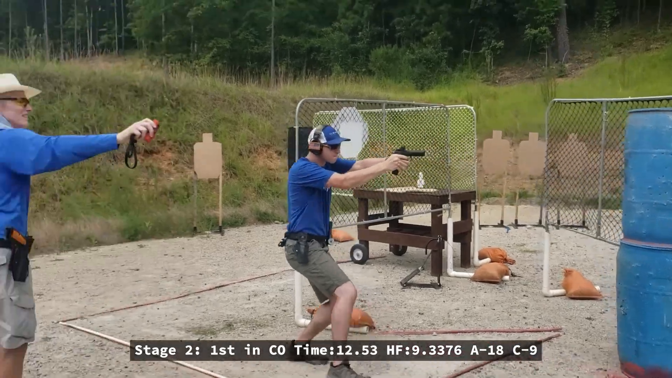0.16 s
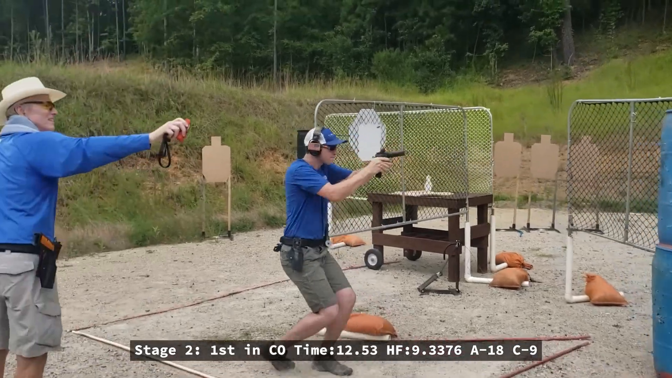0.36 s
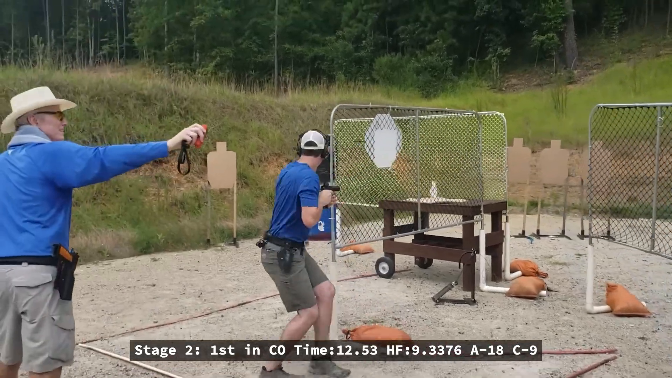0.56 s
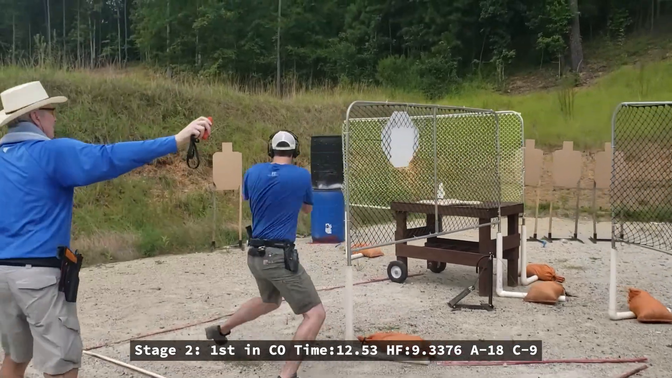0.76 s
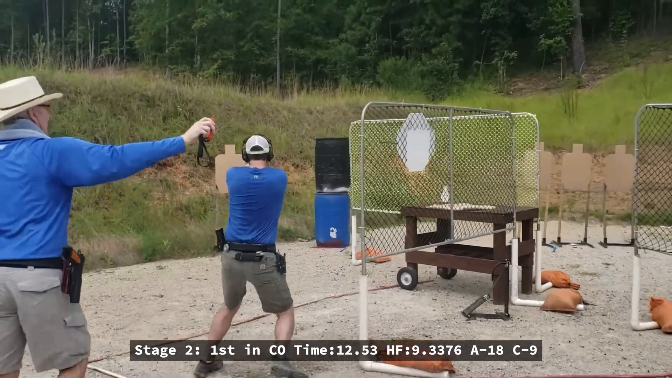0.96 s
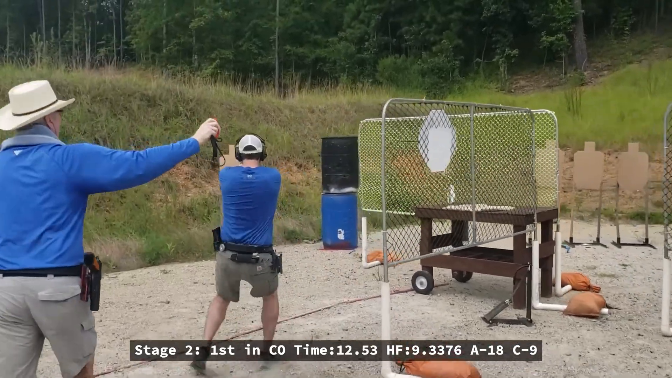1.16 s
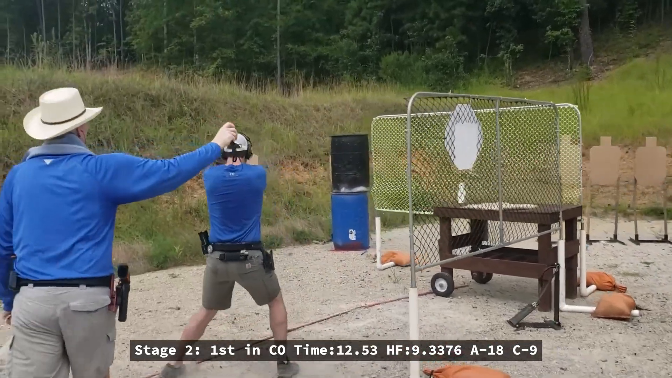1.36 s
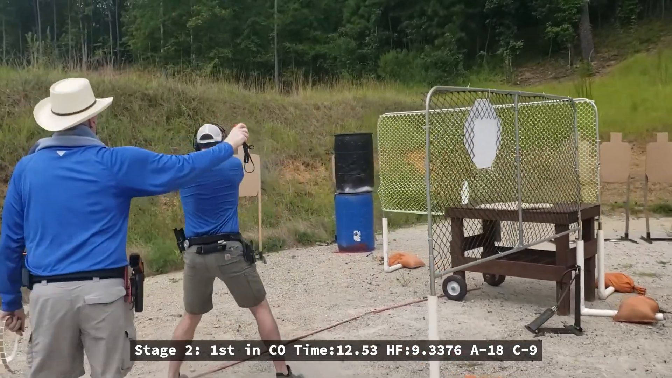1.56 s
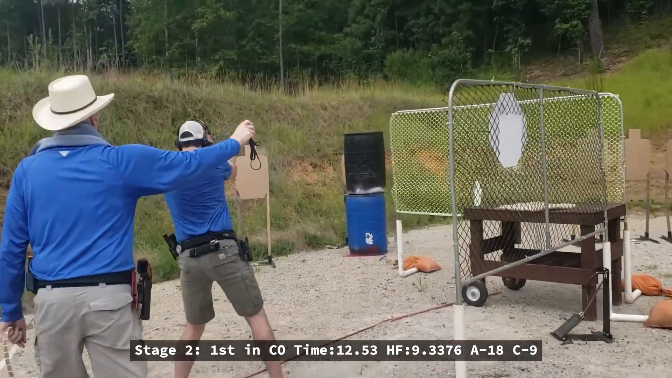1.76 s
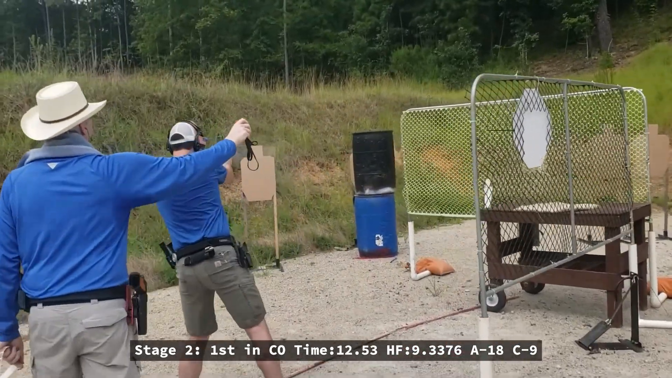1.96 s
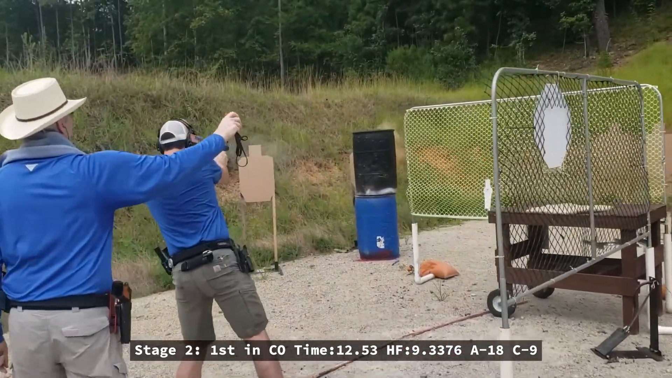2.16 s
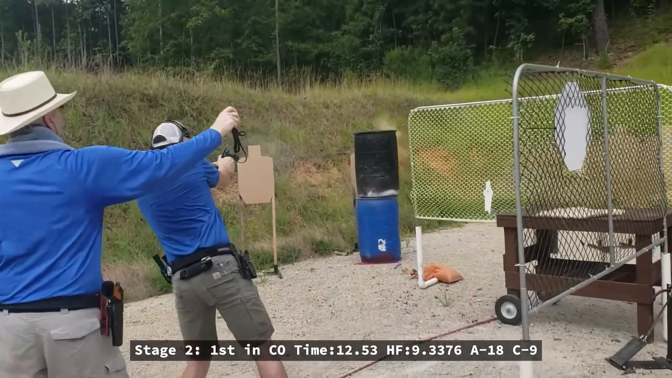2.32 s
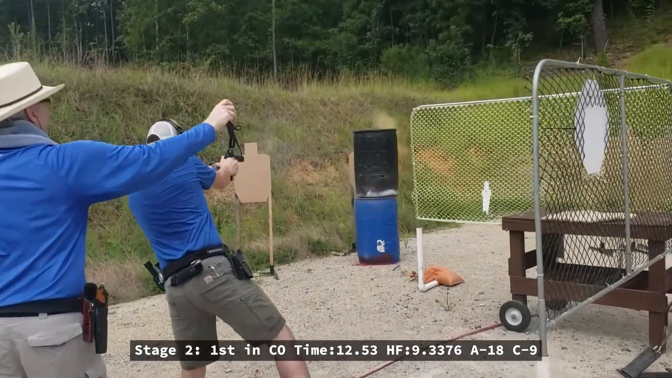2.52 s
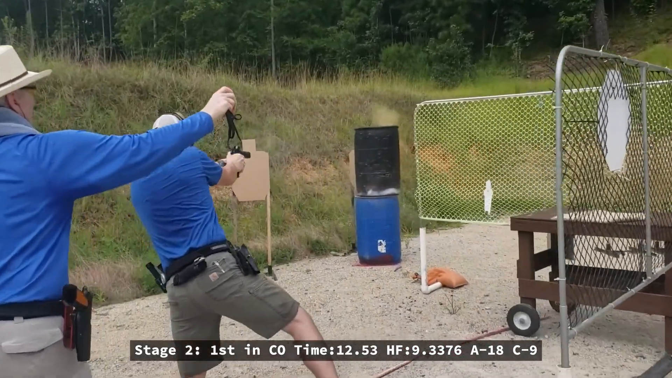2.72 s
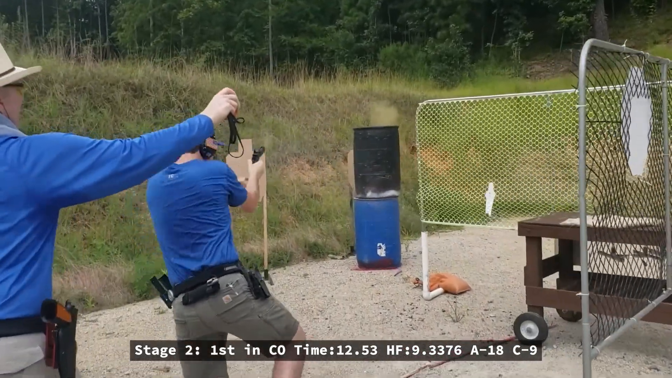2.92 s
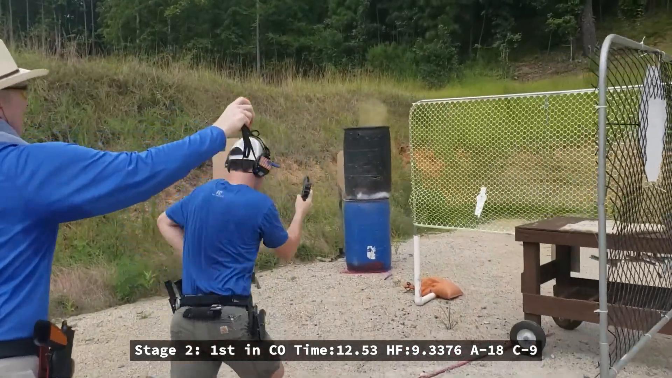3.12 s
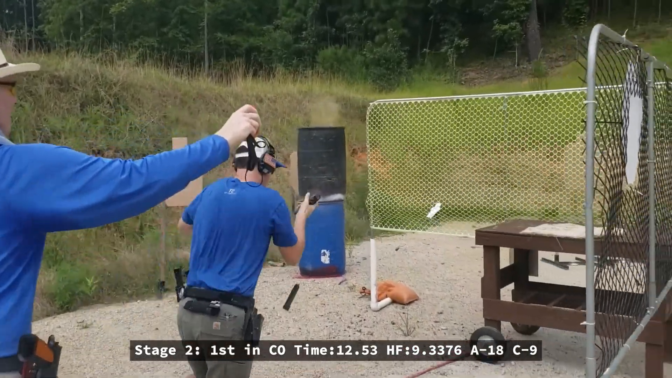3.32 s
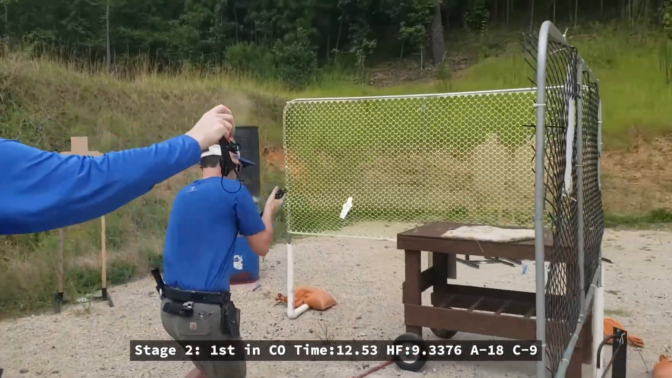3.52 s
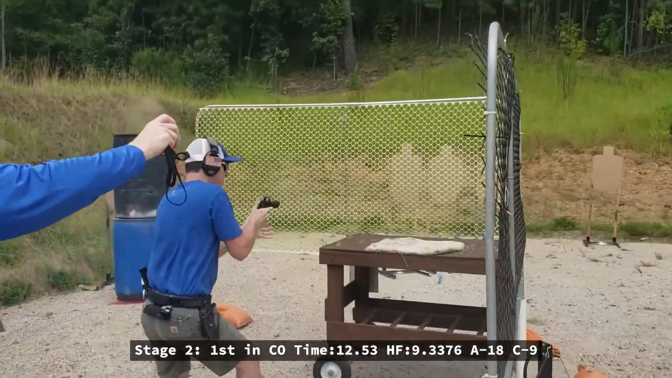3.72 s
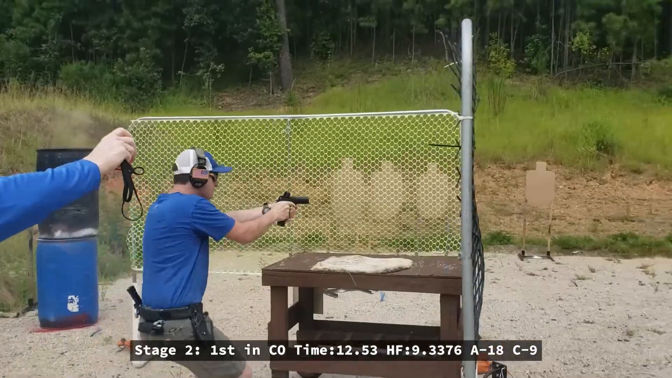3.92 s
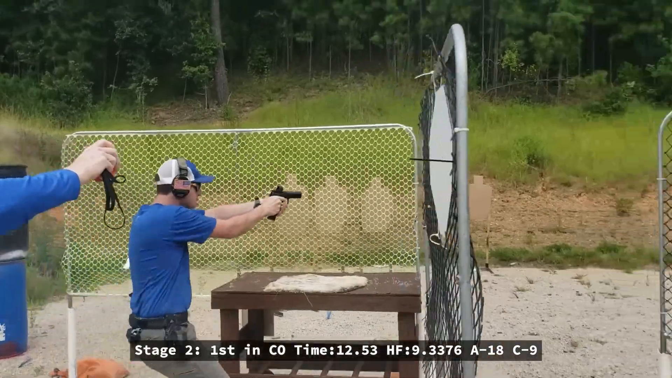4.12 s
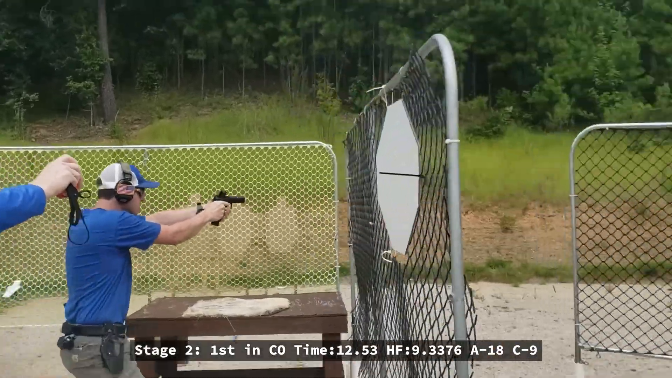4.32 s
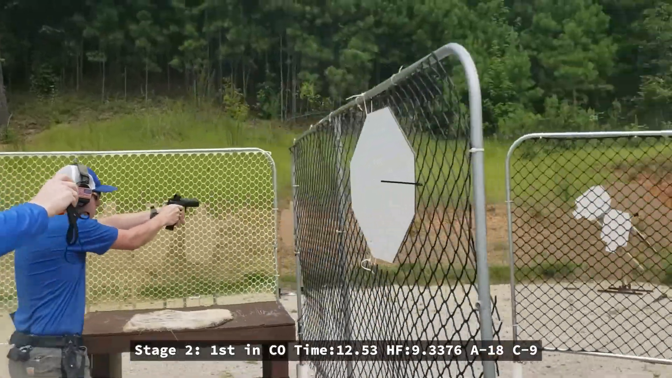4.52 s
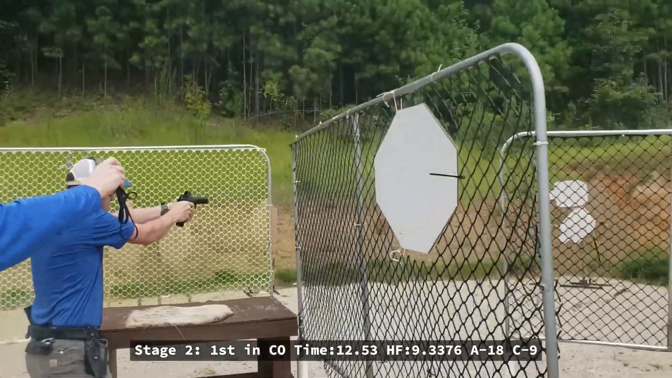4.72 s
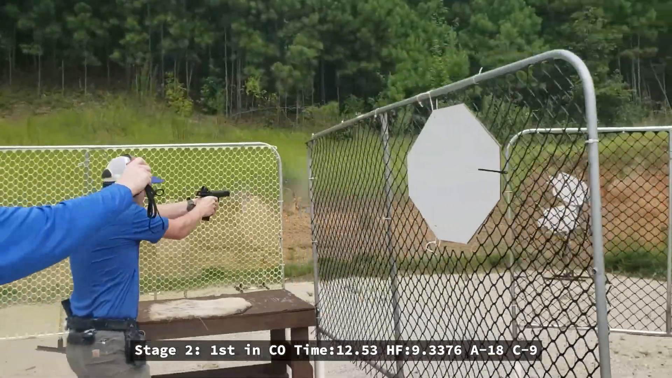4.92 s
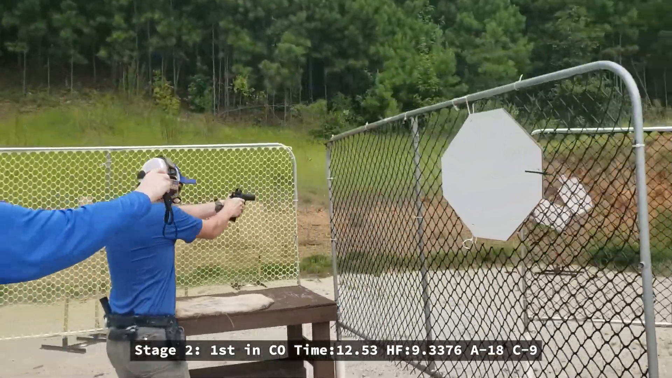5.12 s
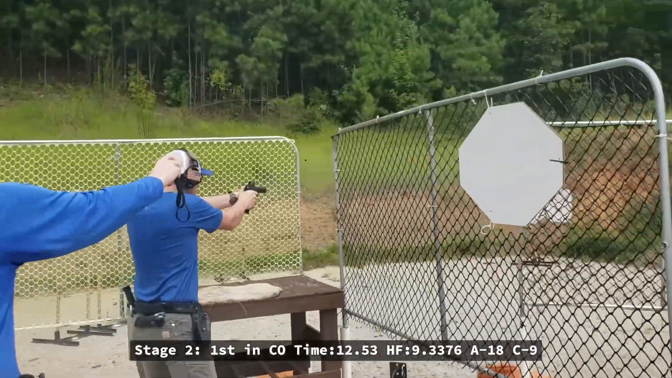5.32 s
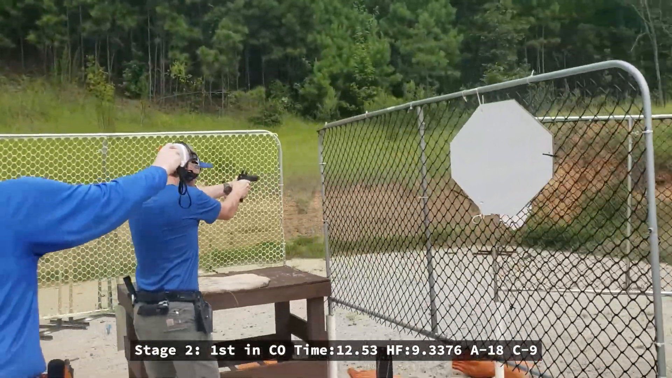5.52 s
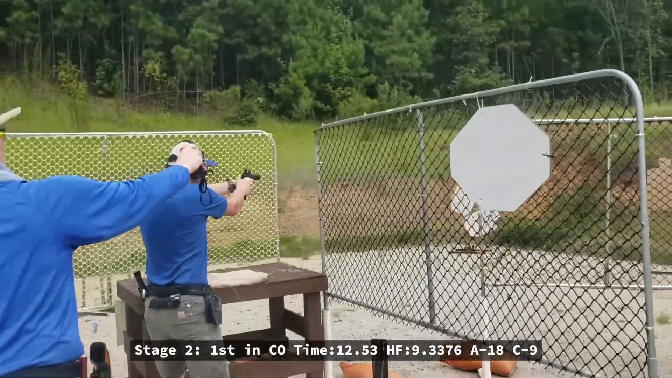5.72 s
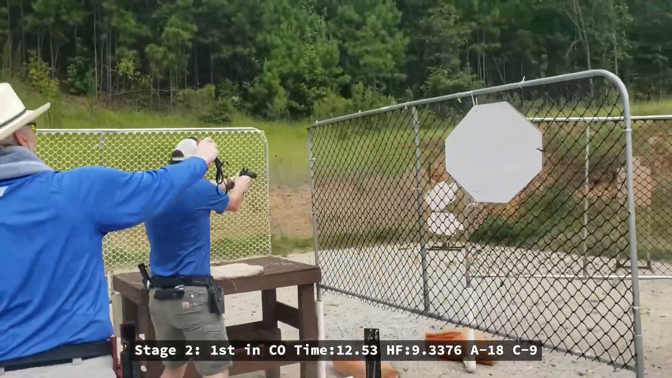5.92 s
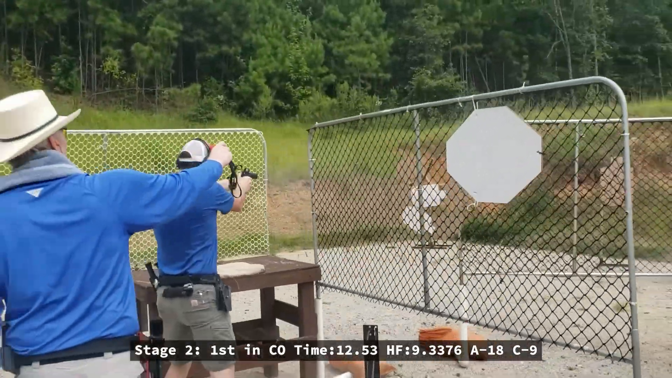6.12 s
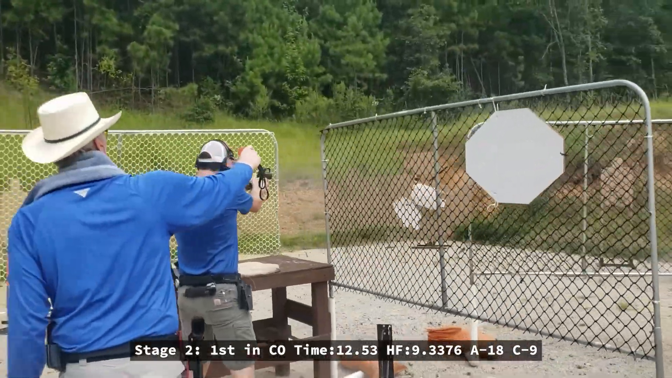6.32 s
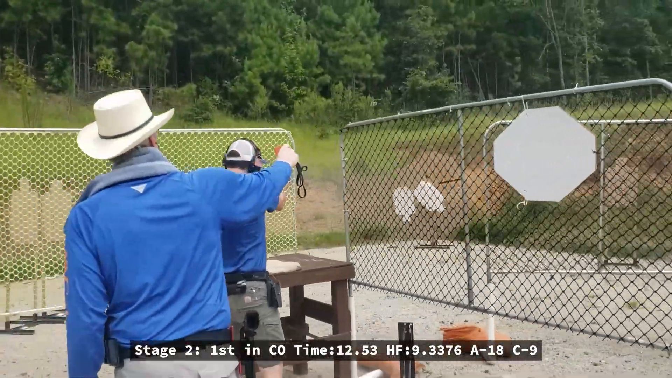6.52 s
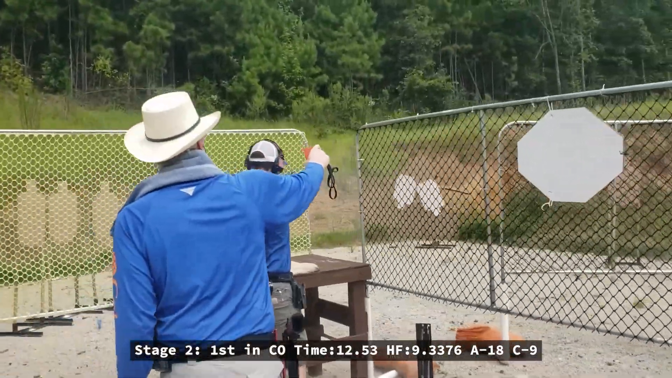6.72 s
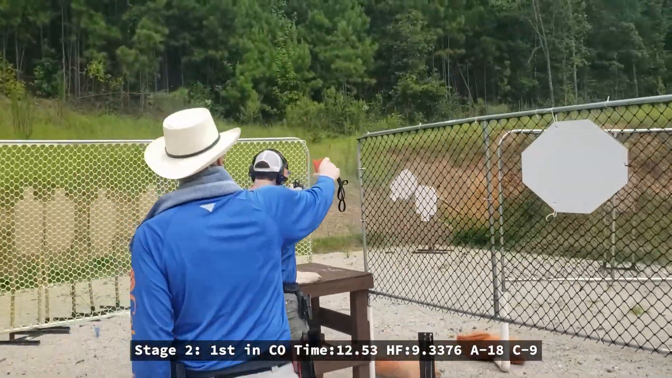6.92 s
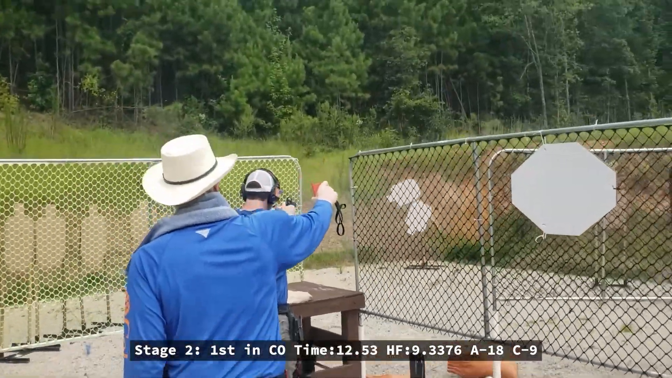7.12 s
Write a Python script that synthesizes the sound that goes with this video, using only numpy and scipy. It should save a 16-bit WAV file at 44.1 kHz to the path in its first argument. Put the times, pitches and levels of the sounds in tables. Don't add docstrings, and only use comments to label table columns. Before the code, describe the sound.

At an outdoor gravel range, an earlier shot is still fading in the woods when a pistol fires two quick shots, then two more, then three. One bullet clangs on steel, which flutters as it tips. Reload clicks and crunching shoes follow, then nine more shots in steady succession. A phone a few steps behind overloads on every blast.

```python
import sys
import numpy as np
from scipy import signal
from scipy.fft import rfft, irfft, next_fast_len
from scipy.io import wavfile
from scipy.ndimage import uniform_filter1d

SR = 44100
rng = np.random.default_rng(int(sys.argv[2]) if len(sys.argv) > 2 else 0)


def elevation(decibels):
    levels = np.asarray(decibels, float)
    return 10 ** (levels / 20)


def inscribe(sig):
    pcm = np.round(np.clip(np.atleast_2d(sig).T, -1, 1) * 32767)
    wavfile.write(sys.argv[1], SR, pcm.astype(np.int16))


N = 320587

# (time [s], peak [dB])
EARLIER_SHOT = (-0.26, -12)
# (frequency [Hz], t60 [s], level [dB])
WOODS_SCATTER = [(156.5, 0.4, 7.5), (705, 1.9, -6), (2020, 1.72, -6), (3370, 1.114, -0.5), (4900, 1.084, 1),
                 (7800, 0.79, 5), (13100, 0.68, 2)]
STAND_OPEN_DB = [-2.3, -0.19, 0.023, -1, -0.012, 0.23]
# (frequency [Hz], level [dB])
AIR_SPECTRUM = [(30, -7.5), (150, -1), (700, 6.5), (2500, 3.5), (5000, -13.5), (12000, -16)]
# (time [s], rumble level [dB])
BREEZE_LEVEL = [(0, -85.5), (.6, -87.5), (2.599, -83), (3.4, -72), (3.85, -86.5), (4.2, -75.5),
                (5.6, -76.5), (7.27, -94)]
# (frequency [Hz], level [dB])
RUMBLE_SPECTRUM = [(20, -14), (55, 0.5), (110, -3.5), (250, -31), (600, -70)]
# (time [s], peak [dB], left-right [dB], left swing [dB], right swing [dB])
STAND_SHOTS = [
    [(0.1136, -11, -2.5, -36, -23), (0.3132, -11, -4, -45, -21)],
    [(1.3304, -13.5, 5, -32, -37), (1.5424, -13.5, 11.5, -34.5, -51)],
    [(1.9859, -11, 8.5, -32.5, -33), (2.2328, -11.5, 2.5, -50, -34.5), (2.83, -10.5, 2.5, -80, -33)],
    [(4.4942, -10.5, 6, -32.5, -29), (4.7247, -11.5, 3, -32, -28), (5.01, -11.5, -0.5, -32, -28)],
    [(5.2664, -13.5, -2, -33, -25.5), (5.6615, -13, -2, -33, -27.5), (5.9239, -12.5, 0.5, -26, -44)],
    [(6.2384, -12.5, -3.5, -45.5, -42), (6.4936, -13, -1, -41.5, -40), (6.8127, -12, -6, -52, -44)],
]
# (delay [s], crack [dB], spread [s], left-right [dB], push [dB])
STAND_PATHS = [
    [(0, 5, 0.00055, 3, 6), (.0032, 6, 0.0013, 9.5, 5.5), (.0056, -3, 0.00077, 13, 8.5),
     (.0078, -17.5, 0.0015, -1.5, -1.5)],
    [(0, 3.5, 0.0011, -13, 8.5), (.003, -2, 0.0021, 3, 8), (.012, 1, 0.0021, -12.5, 3),
     (.039, -14.5, 0.0039, -2.5, -10)],
    [(0, 7.5, 0.00098, -8.5, 9.5), (.003, -4.5, 0.0048, 0, 5), (.012, -5, 0.0032, 6.5, 0.5),
     (.035, -11.5, 0.0028, 3, -15)],
    [(0, 5.5, 0.0013, 1, 6), (.0038, -1.5, 0.0052, -7.5, -4.5), (.0115, -20, 0.00443, -13, -1),
     (.025, -44, 0.0034, 24, -42)],
    [(0, 5.5, 0.0023, 11.5, 1.5), (.0035, 1.5, 0.0029, -7.5, -16), (.0125, -8, 0.003, 4, 0),
     (.025, -57, 0.0027, 2, -27)],
    [(0, 3, 0.0041, 7, 3.5), (.0035, -4, 0.0022, -15, 2), (.0125, 1, 0.003, 9, -1),
     (.0165, -13, 0.00217, -8, -13)],
]
# (delay [s], level re shot [dB], left-right [dB], spread [s], push [dB])
STAND_SLAPS = [
    (0.027, -1, -12, 0.0039, -12),
    (0.0271, 5.5, 2, .0031, -2),
    (0.0248, -2, -3, .0033, 7.5),
    (.039, -5, 1, 0.0035, -2),
    (.0406, 3, 2, .002, -24),
    (0.0416, 1, -6, 0.0023, -26),
]
STAND_SWING_LAG_S = [0.00534, 0.002, 0.00095, 0.00055, 0.00313, 0.0041]
# (frequency [Hz], level [dB], t60 [s])
DRUM_MODES = [
    (678.3, -4, 0.11),
    (730, -1, 0.036),
    (1042, 1, 0.028),
]
STAND_DRUM_DB = [-34.5, -20.5, -17.5, -40, -21, -22]
# (delay [s], level [dB])
DRUM_HEARD = [
    (.012, 2.5),
    (.0255, -3.5),
    (.205, -23.5),
]
# (frequency [Hz], t60 [s], level [dB])
BAY_SCATTER = [(150, 0.25, 1.5), (699, 0.82, -3.5), (1905, 0.48, -2.5), (4980, 0.49, -3), (12000, 0.35, 0)]
STAND_BASS_DB = [-0.5, -1.5, -2, 2.5, 2.5, 2]
# (time [s], peak [dB], left-right [dB])
EARLY_RETURNS = [(0.1402, -15.0, -6.0), (0.144, -15.0, -10.0), (0.1571, -18.0, -8.0), (0.164, -20.0, -5.0),
                 (0.1705, -24.0, -10.0), (0.2193, -34.0, -13.0), (0.2346, -35.0, -11.0),
                 (0.2381, -29.0, -14.0), (0.2461, -30.0, -15.0), (0.2505, -33.0, -12.0),
                 (0.2841, -38.0, -10.0), (0.3398, -14.0, -6.0), (0.3569, -20.0, -8.0),
                 (0.3624, -21.0, -5.0), (0.4194, -35.0, -10.0), (0.4349, -34.0, -12.0),
                 (0.4382, -30.0, -10.0), (0.4465, -31.0, -12.0), (0.4628, -33.0, -12.0),
                 (0.4873, -37.0, -9.0), (1.345, -14.0, -7.0), (1.3574, -15.0, 1.0), (1.3864, -26.0, -6.0),
                 (1.4583, -40.0, -2.0), (1.5531, -14.0, -3.0), (1.5679, -14.0, 1.0), (2.0013, -10.0, -10.0),
                 (2.0111, -9.0, -4.0), (2.0606, -27.0, -7.0), (2.2462, -10.0, -3.0), (2.2574, -11.0, -3.0),
                 (2.2711, -19.0, -5.0), (2.2982, -25.0, -9.0), (2.4025, -35.0, -10.0),
                 (2.4214, -38.0, -10.0), (2.8442, -9.0, -5.0), (2.8547, -11.0, 0.0), (2.8652, -14.0, -11.0),
                 (2.8708, -17.0, -1.0), (2.9247, -21.0, -5.0), (2.9276, -21.0, -7.0)]
# (time [s], peak [dB], left-right [dB])
LATE_RETURNS = [(4.5064, -15.0, -6.0), (4.5131, -19.0, -2.0), (4.5329, -17.0, 0.0), (4.5386, -21.0, -8.0),
                (4.5866, -30.0, -7.0), (4.6443, -28.0, -6.0), (4.6528, -30.0, -4.0), (4.7362, -12.0, -3.0),
                (4.7637, -17.0, 0.0), (4.7824, -23.0, -9.0), (4.8057, -29.0, -8.0), (4.819, -33.0, -8.0),
                (4.8749, -34.0, -2.0), (4.8832, -28.0, -8.0), (4.9, -37.0, -3.0), (5.0224, -12.0, -3.0),
                (5.0386, -20.0, -10.0), (5.0497, -16.0, -1.0), (5.0675, -22.0, -4.0),
                (5.1394, -37.0, -11.0), (5.1608, -33.0, -5.0), (5.1692, -30.0, -7.0), (5.1862, -34.0, -6.0),
                (5.2786, -16.0, -2.0), (5.3067, -14.0, 1.0), (5.3263, -23.0, -9.0), (5.3921, -36.0, -10.0),
                (5.4259, -37.0, -4.0), (5.4429, -35.0, -7.0), (5.6771, -16.0, 0.0), (5.7018, -16.0, -1.0),
                (5.7703, -31.0, -11.0), (5.8377, -37.0, -3.0), (5.9375, -13.0, -7.0), (5.9652, -16.0, 1.0),
                (5.9842, -22.0, -5.0), (6.0327, -32.0, -9.0), (6.0375, -34.0, -8.0), (6.0505, -37.0, -11.0),
                (6.0834, -37.0, -5.0), (6.1007, -37.0, -7.0), (6.2553, -11.0, -8.0), (6.2722, -23.0, 0.0),
                (6.2804, -14.0, 0.0), (6.2921, -21.0, -6.0), (6.3647, -36.0, -12.0), (6.4159, -37.0, -3.0),
                (6.5084, -12.0, -1.0), (6.5283, -20.0, -11.0), (6.5346, -15.0, -4.0), (6.5533, -23.0, -2.0),
                (6.6162, -36.0, -7.0), (6.6187, -34.0, -15.0), (6.828, -13.0, -5.0), (6.8472, -19.0, -1.0),
                (6.8565, -19.0, -11.0), (6.8762, -22.0, -3.0), (6.9365, -33.0, -6.0), (6.9911, -35.0, -3.0)]
# (time [s], tick [dB], ring [Hz], ring [dB], t60 [s])
CASE_LANDINGS = [(.575, -67, 11500, -64, 0.29), (.883, -58, 9880, -60.5, 0.06),
                 (1.094, -47.5, 11000, -67, .2), (1.134, -48, 11000, -61, 0.14),
                 (1.151, -39, 11200, -54.5, 0.087), (1.2165, -70, 10100, -62, 0.24),
                 (1.263, -75, 11700, -66, 0.1), (1.305, -70, 11600, -64, 0.1),
                 (3.118, -54, 10530, -56, 0.48), (4.015, -64, 9600, -76.5, .15),
                 (4.28, -76, 10500, -72, 0.65), (4.31, -75, 4630, -78.5, 0.5), (4.35, -71, 4050, -75, 0.14)]
# (time [s], crunch [dB], rustle [dB], rise over 20 dB [s], fall over 20 dB [s])
FOOTFALLS = [(.892, -69.5, -79, 0.13, 0.0092), (1.09, -68, -77.5, 0.9, 0.079),
             (1.154, -73, -83, 0.057, .03), (1.186, -58.5, -74, 0.021, 0.16), (1.29, -68, -67, 0.15, 0.025),
             (3.535, -53, -58, 0.057, 0.039), (3.614, -76, -45.5, 0.023, 0.037),
             (3.797, -60, -66, .01, 0.04), (4.107, -55, -68, 0.032, 0.02), (4.213, -63, -64, 0.1, 0.057),
             (4.302, -67.5, -77, 0.017, 0.046), (4.404, -62.5, -77.5, .025, 0.098),
             (4.467, -62, -60, 0.2, 0.06)]
# (start [s], end [s], level [dB])
CLOTH_RUBS = [
    (.85, 1.31, -80),
    (3.565, 4.096, -71),
]
# (frequency [Hz], level [dB])
CRUNCH_SPECTRUM = [(60, -16), (200, -4), (700, -0.5), (1400, -3), (2500, -10), (6000, -26)]
# (frequency [Hz], level [dB])
RUSTLE_SPECTRUM = [(1000, -25), (2500, 3.5), (5000, -0.5), (12000, 2.5), (16000, -2.5)]
# (time [s], peak [dB], frequency [Hz])
PEBBLES = [
    (3.988, -62.5, 1020),
    (4.08, -59.5, 960),
    (4.096, -61, 920),
    (4.164, -60, 1250),
    (5.4, -63, 851),
    (13, -61, 830),
    (4.427, -53, 5100),
    (3.9, -42, 1470),
    (3.5, -58, 5000),
    (1.308, -63, 5000),
]
# (time [s], peak [dB], left-right [dB])
PLATE_HIT_EVENT = [
    (2.8947, -10.5, 5),
]
# (frequency [Hz], level [dB], t60 [s])
PLATE_MODES = [(2837, -25.5, 0.19), (3343, -22, 0.18), (4800, -23, .14), (4150, -23.5, 0.2),
               (5270, -21.5, 0.12), (4377, -21, .38), (5152, -23, .4), (6702, -18, .43), (7892, -15, .2),
               (10200, -28.5, .25), (12200, -8.5, 0.089), (12300, -9.5, .08), (13650, -26, .1),
               (14300, -19, .15)]
# (time [s], level [dB])
PLATE_HUM = [
    (2.91, -56),
    (2.95, -54),
    (3.08, -49.5),
    (3.27, -59),
    (3.316, -61),
    (3.362, -55),
    (3.47, -68.5),
    (3.486, -79.5),
    (3.75, -84.5),
]
# (time [s], peak [dB], top re body [dB], left-right [dB])
RELOAD_CLICKS = [(3.506, -48.5, -17, 3), (3.5967, -35, -12, 1), (3.6132, -46.5, 2.5, 0),
                 (3.619, -48, -2, -3), (3.6875, -50, -19, 2), (3.7374, -47.5, -11.5, 2),
                 (3.7524, -44, -26, 0), (3.7953, -53, -17, -4), (3.832, -46, -11, 1),
                 (3.8994, -61.5, -16, 0), (3.915, -55, -10, 3), (3.9434, -58, -5.5, 1.5),
                 (3.9514, -53, -16.5, 21), (4.011, -58, -19, -1.5)]
# (frequency [Hz], left-right likeness [-1..1])
PORT_LIKENESS = [(60, 0.92), (180, 0.93), (550, 0.64), (1650, -0.32), (4970, 0.087), (15000, 0.006)]
# (frequency [Hz], level [dB])
PORT_COLOUR = [(59, -22), (110, -12), (250, -7.5), (420, -8.5), (750, -2.5), (1500, -4.5), (2200, -9),
               (3700, -8), (4950, -1), (6680, -13), (8200, -22.5), (10000, -10.5), (14400, -18.5),
               (14900, -44.5)]
# (frequency [Hz], left-right [dB])
PORT_MISMATCH = [(60, -0.5), (110, -1), (200, -3), (380, -1), (700, -2.5), (1290, 3), (2380, -1),
                 (4400, -6.5), (8120, 5.5), (15000, -3.5)]
# (frequency [Hz], level [dB])
DUCT_RESPONSE = [(7000, -0.5), (7800, -5), (8350, -7), (8900, -5.5), (9800, -3.5), (14700, 3.5),
                 (15200, -18.5), (16400, -30)]

SLAP_RISE_S = 0.00045


def unit(x):
    return x / np.sqrt(np.mean(x ** 2) + 1e-20)


def along(points, hz, axis=1):
    p = np.array(points, float)
    return np.interp(np.log(hz + 1), np.log(p[:, 0] + 1), p[:, axis])


def pan(left_right_db):
    return elevation(np.array([[left_right_db / 2], [-left_right_db / 2]]))


def add(out, s, x):
    i = round(s * SR)
    out[:, i:i + x.shape[1]] += x[:, :N - i]


def seconds(samples):
    return np.arange(samples) / SR


def decay_db(t, t60):
    return -60 * t / t60


def sine(hz, t):
    return np.sin(2 * np.pi * hz * t)


def coloured(x, db):
    size = 4096
    gain = elevation(db(np.fft.rfftfreq(size, 1 / SR)))
    cepstrum = irfft(np.log(gain + 1e-6))
    cepstrum[..., 1:size // 2] *= 2
    cepstrum[..., size // 2 + 1:] = 0
    impulse = irfft(np.exp(rfft(cepstrum)))
    return signal.oaconvolve(x, np.atleast_2d(impulse), axes=1)[:, :N]


def pair():
    size = next_fast_len(N)
    likeness = along(PORT_LIKENESS, np.fft.rfftfreq(size, 1 / SR))
    turn = np.arccos(np.clip(likeness, -1, 1)) / 2
    spectra = rfft(rng.standard_normal((2, size))) * [np.cos(turn), np.sin(turn)]
    mid, side = irfft(spectra, size)[:, :N]
    return np.array([mid + side, mid - side])


def lumps(per_s, depth_db):
    knots = np.clip(rng.standard_normal((2, N * per_s // SR + 2)), -2, 2)
    place = np.arange(N) * per_s / SR
    return elevation(depth_db * np.array([np.interp(place, np.arange(len(k)), k) for k in knots]))


def burst(spread_s, rise_s=0.00036):
    t = seconds(SR // 20)
    envelope = np.exp(-t / max(spread_s, 1e-4)) * (1 - np.exp(-t / max(rise_s, 1e-5)))
    return rng.standard_normal((2, len(t))) * envelope


def diffuse_return(space, rise_s, ends_s, plate_db, bass_db, open_db):
    lull_from_s, lull_db = .018, -2
    start_s, patch_db = .003, 1.83
    hz, t, z = signal.stft(pair(), SR, nperseg=128)
    power = np.zeros(z.shape[1:])
    bass = 1 / (1 + (hz[:, None] / 700) ** 2)
    t60 = along(space, hz)[:, None]
    others = [EARLIER_SHOT, (PLATE_HIT_EVENT[0][0], plate_db)]
    stands = zip(STAND_SHOTS + [others], [*bass_db, 0], [*open_db, 0], STAND_SLAPS + [(0,)])
    for shots, low_db, stand_db, (slap_s, *_) in stands:
        for s, db, *_ in shots:
            live = (t > s + start_s) & (t < s + min(2, 3 * ends_s))
            age = t[live] - s - start_s
            fade = np.exp(-6 * np.log(10) * age / t60)
            fade = fade * (1 - np.exp(-(age / rise_s) ** 2)) * np.exp(-(age / ends_s) ** 4)
            dip_db = lull_db * (age > lull_from_s) * (age < slap_s - start_s)
            power[:, live] += elevation(2 * (db + stand_db + dip_db)) * elevation(2 * low_db * bass) * fade
    patches = uniform_filter1d(rng.standard_normal(z.shape), size=3, axis=1)
    patches = uniform_filter1d(patches, size=24, axis=2)
    gain = elevation(patch_db * unit(patches)) * np.sqrt(power) * elevation(along(space, hz, axis=2))[:, None]
    return signal.istft(z * gain, SR, nperseg=128)[1][:, :N]


def woods():
    roll = diffuse_return(WOODS_SCATTER, rise_s=0.028, ends_s=np.inf, plate_db=-15.5,
                          bass_db=np.zeros(len(STAND_SHOTS)), open_db=STAND_OPEN_DB)
    return elevation(-22.0) * lumps(25, depth_db=2.0) * lumps(200, depth_db=2.0) * roll


def air():
    noise = unit(coloured(pair(), lambda hz: along(AIR_SPECTRUM, hz)))
    return elevation(-73.5) * lumps(12, depth_db=2.5) * noise


def swing():
    low_hz, top_hz, late_s = 48, 500, 0.0018
    left_t60_s, right_t60_s, swing_db = 0.29, 0.084, 19.5
    shake_db, shake_t60_s = -35, .45
    offset, shake, t = np.zeros((2, N)), np.zeros((2, N)), seconds(SR // 2)
    for shots, lag_s in zip(STAND_SHOTS, STAND_SWING_LAG_S):
        for s, _, _, left_db, right_db in shots:
            left = elevation(left_db + swing_db + decay_db(t, left_t60_s))
            right = elevation(right_db + swing_db + decay_db(t, right_t60_s))
            add(offset, s + late_s, left * [[1], [0]])
            add(offset, s + late_s + lag_s, right * [[0], [1]])
            add(shake, s, elevation(max(left_db, right_db) + shake_db + decay_db(t, shake_t60_s))[None])
    gust = elevation(np.interp(seconds(N), *np.transpose(BREEZE_LEVEL))) + shake
    breeze = unit(coloured(rng.standard_normal((2, N)), lambda hz: along(RUMBLE_SPECTRUM, hz)))
    smooth = signal.sosfilt(signal.butter(2, top_hz, fs=SR, output="sos"), offset)
    wave = signal.sosfilt(signal.butter(4, low_hz, "high", fs=SR, output="sos"), smooth)
    return wave + gust * breeze


def arrival(crack_db, push_db, spread_s, width_s, rise_s, rough):
    t = seconds(SR // 20)
    u = np.clip(t - .0003 - rng.uniform(0, .0003, (2, 1)), 0, 1) / width_s
    facets = np.zeros((2, len(t)))
    places = (rng.uniform(0, 1.2, size=4) * spread_s * SR).astype(int)
    facets[:, places] = rough * rng.normal(0, 0.62, size=4)
    facets[:, 0] = 1
    pulse = (u > 0) * (u - 1) * np.exp(-u)
    push = signal.fftconvolve(pulse, facets, axes=1)[:, :len(t)]
    crack = elevation(crack_db + rng.normal(0, 1, (2, 1))) * burst(spread_s, rise_s)
    return elevation(push_db) * push + crack


def blasts():
    out = np.zeros((2, N))
    for shots, paths, slap in zip(STAND_SHOTS, STAND_PATHS, STAND_SLAPS):
        slap_s, slap_db, slap_side_db, slap_spread_s, slap_push_db = slap
        for s, db, lr_db, *_ in shots:
            for k, (delay_s, crack_db, spread_s, side_db, push_db) in enumerate(paths):
                width_s = .0005 if k == 0 else .0003
                wave = arrival(crack_db, push_db, spread_s, width_s, rise_s=0.000099, rough=k > 1)
                add(out, s + 0.0011 + delay_s, elevation(db) * pan(lr_db + side_db) * wave)
            wave = arrival(-5.0, slap_push_db, slap_spread_s, 0.0002, SLAP_RISE_S, rough=True)
            add(out, s + slap_s, elevation(db + slap_db) * pan(slap_side_db) * wave)
    return out


def bay():
    scatter = diffuse_return(BAY_SCATTER, rise_s=0.0048, ends_s=0.07, plate_db=-24.0,
                             bass_db=STAND_BASS_DB, open_db=np.zeros(len(STAND_SHOTS)))
    return elevation(-6) * lumps(250, depth_db=1.5) * scatter


def drum():
    out, t = np.zeros((2, N)), seconds(SR // 8)
    for shots, near_db in zip(STAND_SHOTS, STAND_DRUM_DB):
        for s, db, *_ in shots:
            for delay_s, loss_db in DRUM_HEARD:
                boom = np.zeros((2, len(t)))
                for hz, level_db, t60 in DRUM_MODES:
                    level = elevation(level_db + rng.normal(0, 1.4, (2, 1)) + decay_db(t, t60))
                    boom += level * sine(hz * rng.normal(1, 0.046), t)
                add(out, s + delay_s, elevation(db + near_db + loss_db) * boom)
    return out


def returns():
    spread_s, level_db, left_db, bass = 0.0019, -4, 4, 0.5
    band = signal.butter(1, [3500, 6600], "band", fs=SR)
    out = np.zeros((2, N))
    for s, db, lr_db in [*EARLY_RETURNS, *LATE_RETURNS]:
        crack = burst(spread_s, SLAP_RISE_S)
        crack = bass * crack + signal.lfilter(*band, crack)
        crack = crack / np.linalg.norm(crack, axis=1, keepdims=True) * np.sqrt(spread_s * SR / 2)
        add(out, s, elevation(db + level_db) * pan(lr_db + left_db) * crack)
    return out


def cases():
    side_db, spin_hz, spin_db = 3.5, 37, 4.8
    out, t = np.zeros((2, N)), seconds(SR // 2)
    for s, tick_db, hz, ring_db, t60 in CASE_LANDINGS:
        level = elevation(ring_db + 4.5 + decay_db(t, t60) + spin_db * sine(spin_hz, t))
        ring = level * (1 - np.exp(-t / 0.0013)) * sine(hz, t)
        add(out, s, pan(side_db) * ring)
        add(out, s, elevation(tick_db + 6) * np.diff(burst(0.0006)))
    return out


def steps():
    t, level = seconds(N), np.zeros((2, N))
    age = np.arange(-SR // 2, SR // 2) / SR
    for s, crunch_db, rustle_db, rise_s, fall_s in FOOTFALLS:
        drop_db = 20 * np.maximum(-age / rise_s, age / fall_s)
        add(level, s - .5, elevation([[crunch_db], [rustle_db]] - drop_db))
    rub = sum(elevation(db) * uniform_filter1d(1. * (t > a) * (t < b), size=2000) for a, b, db in CLOTH_RUBS)
    crunch = unit(coloured(lumps(400, depth_db=3.5) * pair(), lambda hz: along(CRUNCH_SPECTRUM, hz)))
    rustle = unit(coloured(lumps(150, depth_db=1.5) * pair(), lambda hz: along(RUSTLE_SPECTRUM, hz)))
    return elevation(-1.0) * (level[0] * crunch + elevation(5.5) * (level[1] + rub) * rustle)


def stones():
    ring_cycles = 1.3
    out, t = np.zeros((2, N)), seconds(SR // 50)
    for s, db, hz in PEBBLES:
        ring = np.exp(-t * hz / ring_cycles) * sine(hz, t)
        add(out, s, elevation(db - 8) * (ring + 0.29 * burst(0.00095)[:, :len(t)]))
    return out


def plate():
    flutter_db, hum_hz = 4.2, 1820
    out, t = np.zeros((2, N)), seconds(SR)
    s, db, lr_db = PLATE_HIT_EVENT[0]
    for hz, level_db, t60 in PLATE_MODES:
        phase = rng.uniform(0, 2 * np.pi, (2, 1))
        knots = rng.standard_normal(size=100)
        waver = np.interp(t * hz * 0.013, np.arange(len(knots)), knots)
        waver_db = flutter_db * np.minimum(t / .03, 1) * waver
        add(out, s, elevation(db + level_db + decay_db(t, t60) + waver_db) * np.sin(2 * np.pi * hz * t + phase))
    hum_db = np.interp(t + s, *np.transpose(PLATE_HUM), left=-120, right=-120)
    add(out, s, elevation(hum_db + 7.0) * np.sin(2 * np.pi * hum_hz * t + [[0], [1.2]]))
    add(out, s, elevation(db + 3.0) * pan(lr_db) * np.diff(burst(0.0041)))
    return out


def clang():
    level_db, mean_t60_s, low_hz, top_hz = -31, 0.081, 2600, 7200
    out, t = np.zeros((2, N)), seconds(SR // 3)
    s, db, _ = PLATE_HIT_EVENT[0]
    for place, size, life, *turn in rng.uniform(0, 1, size=(36, 5)):
        hz = low_hz + place * (top_hz - low_hz)
        level = elevation(db + level_db + 8 * size + decay_db(t, mean_t60_s * (.5 + life)))
        add(out, s, level * np.sin(2 * np.pi * (hz * t + np.c_[turn])))
    return out


def reload():
    click_s, heavy_db, longer_s_per_db = .004, -48, .0004
    out = np.zeros((2, N))
    for s, db, top_db, lr_db in RELOAD_CLICKS:
        spread_s = click_s + longer_s_per_db * max(db - heavy_db, 0)
        click = np.diff(burst(spread_s)[:1] + 1.65 * burst(spread_s))
        top = np.gradient(np.gradient(click, axis=1), axis=1)
        add(out, s, elevation(db + 1.0) * pan(lr_db) * (click + elevation(top_db + 13.5) * top))
    return out


def scene():
    space = woods() + air() + bay()
    gun = blasts() + drum() + returns()
    return space + gun + cases() + steps() + stones() + plate() + clang() + reload()


def band_limit(x):
    return signal.sosfilt(signal.butter(12, 16500, fs=SR, output="sos"), x)


def record(dry):
    top, hardness = .44, 4.5
    ports = coloured(dry, lambda hz: along(PORT_COLOUR, hz) + along(PORT_MISMATCH, hz) * [[.5], [-.5]])
    x = elevation(5) * ports + swing()
    clipped = x / (1 + np.abs(x / top) ** hardness) ** (1 / hardness)
    mix = coloured(clipped, lambda hz: along(DUCT_RESPONSE, hz))
    return band_limit(mix)


dry = scene()
out = record(dry)
inscribe(out)
```